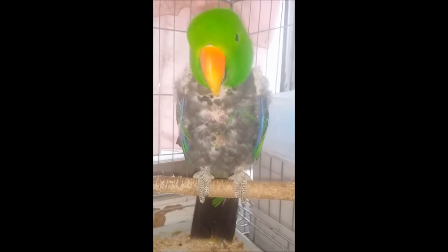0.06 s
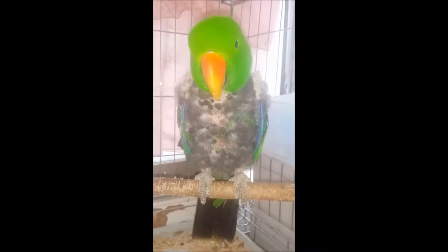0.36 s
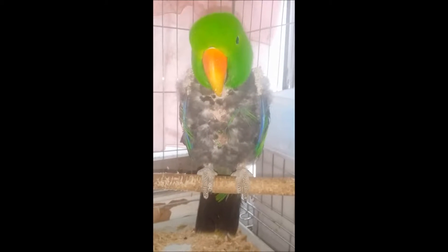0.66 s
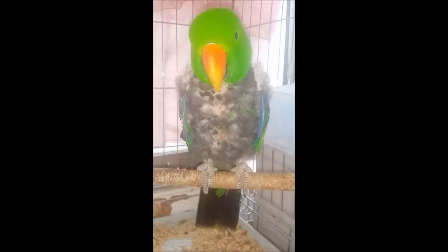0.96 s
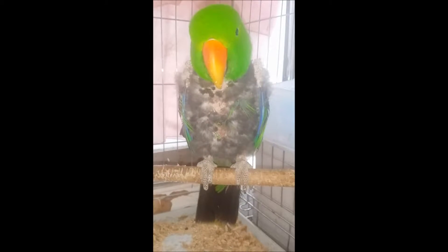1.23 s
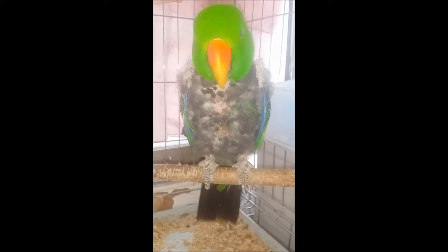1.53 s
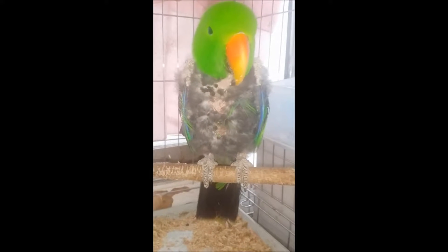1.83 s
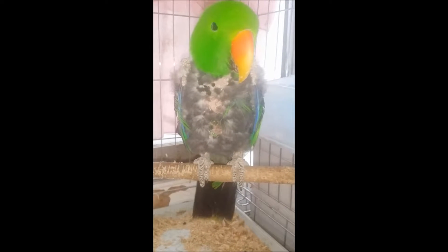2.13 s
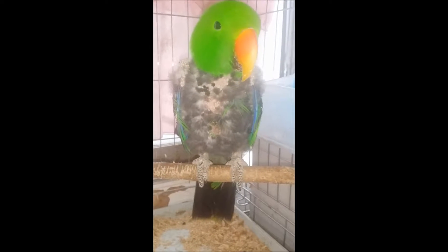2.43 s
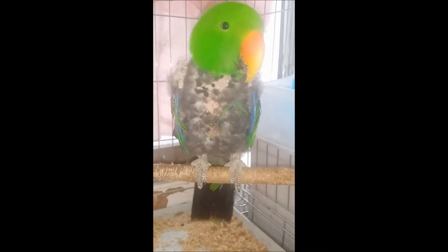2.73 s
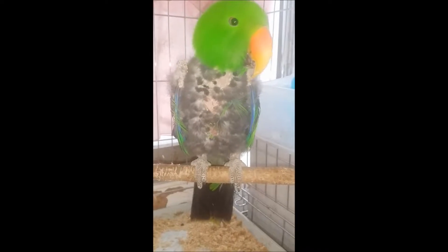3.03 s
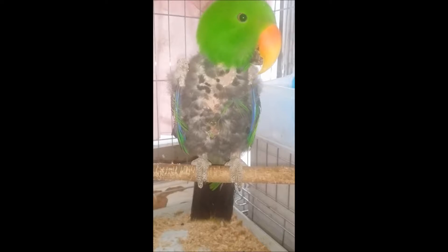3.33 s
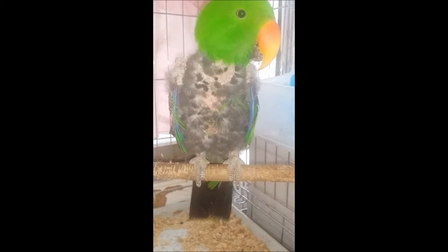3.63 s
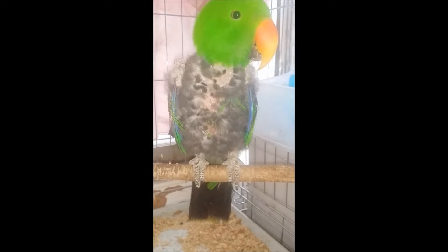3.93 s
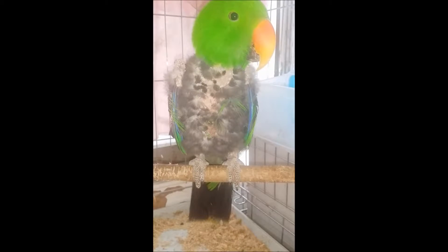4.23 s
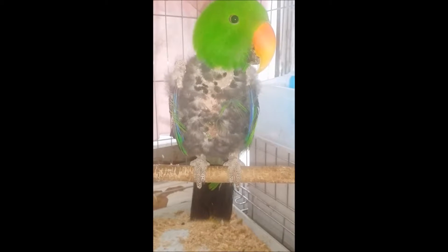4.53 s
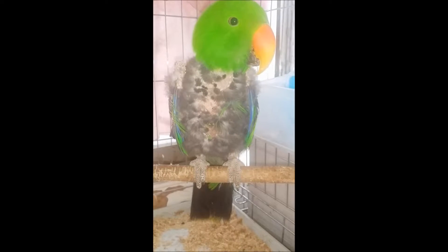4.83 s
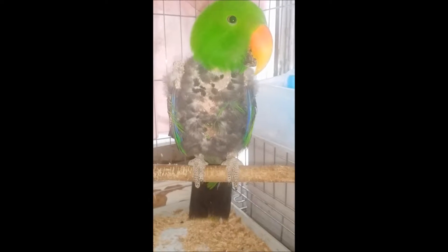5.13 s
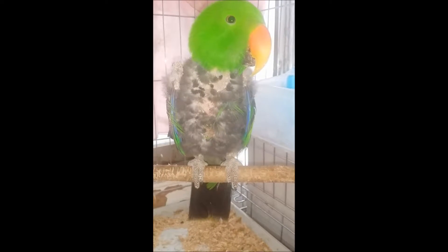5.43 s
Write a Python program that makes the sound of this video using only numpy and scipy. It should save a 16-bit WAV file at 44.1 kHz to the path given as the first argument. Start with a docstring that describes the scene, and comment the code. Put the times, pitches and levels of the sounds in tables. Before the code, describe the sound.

A parrot gives a tiny shrill squeak, then shuffles on its wooden perch with soft thuds, gritty claw scratches and short, hissy rasps. Sharp beak or claw clicks follow in the middle, with a light rustle of feathers and dull bumps of the cage. After a lull, a few more clicks lead to a rough, squeaky call. It is all close by in a small, quiet room.

```python
"""Parrot on its perch

A parrot shifts about on a wooden perch in a wire cage, close by in a small room.
Beak and claws click and scratch, knocking the wood and ringing the bars; feet thud on the
perch, the cage sways and feathers rustle. Soft, hissy rasps come in between. Shrill squeaks
open and close the scene, two-voiced because each side of the syrinx whistles on its own."""
import sys
import numpy as np
from scipy import signal
from scipy.fft import rfft, irfft, next_fast_len
from scipy.io import wavfile

SR = 44100
rng = np.random.default_rng(int(sys.argv[2]) if len(sys.argv) > 2 else 0)


def transcribe(signal):
    """Save signal, clipped to [-1, 1], as a 16-bit WAV file at the path in sys.argv[1]."""
    frames = np.atleast_2d(signal).T
    limited = np.clip(frames, -1, 1)
    pcm = np.round(limited * 32767).astype(np.int16)
    wavfile.write(sys.argv[1], SR, pcm)


N = 246078
TIME = np.arange(N) / SR


def undb(db):
    """Decibels to gain."""
    return 10 ** (np.asarray(db) / 20)


def unit(x):
    """Scale to rms 1."""
    return x / np.sqrt(np.mean(x ** 2) + 1e-20)


def add(out, start_s, x):
    """Mix a sound in at its start time."""
    i = max(0, int(start_s * SR))
    out[i:i + len(x)] += x[:max(0, N - i)]


def band(x, low_hz, high_hz, order=2):
    """Band-pass between two edges."""
    high_hz = min(high_hz, .47 * SR)
    low_hz = min(low_hz, .95 * high_hz)
    return signal.sosfilt(signal.butter(order, [low_hz, high_hz], "band", fs=SR, output="sos"), x)


def colour(x, eq):
    """Shape a sound with an EQ curve of (freq_hz, gain_db) points."""
    hz, db = np.transpose(eq)
    n = next_fast_len(len(x), True)
    bins_hz = np.fft.rfftfreq(n, 1 / SR)
    gain = undb(np.interp(np.log(bins_hz + 1), np.log(hz), db))
    return irfft(rfft(x, n) * gain, n)[:len(x)]


def wobble(n, rate_hz):
    """Smooth random motion of rms 1."""
    knots = np.arange(n) * rate_hz / SR
    return unit(np.interp(knots, np.arange(16384), rng.standard_normal(16384)))


def grit(n, spread_db):
    """Friction: dense tiny slips of very unequal size."""
    return unit(rng.standard_normal(n) * undb(spread_db * wobble(n, 1500)))


def ring(x, modes):
    """Drive a set of decaying modes."""
    t = TIME[:SR // 6]
    response = sum(undb(db) * np.sin(2 * np.pi * hz * t) * np.exp(-np.log(1000) * t / t60_s)
                   for hz, db, t60_s in modes)
    return signal.fftconvolve(x, response / np.linalg.norm(response))[:len(x)]


def swell(rise_s, hold_s, fall_s):
    """Pressure that builds up, holds and dies away by 20 dB every fall_s."""
    t = TIME[:SR // 3]
    return np.minimum(t / rise_s, 1) * 10 ** (-np.maximum(t - rise_s - hold_s, 0) / fall_s)


def match(x, envelope):
    """Give a sound the rms of an envelope."""
    return unit(x) * np.sqrt(np.mean(envelope ** 2))


def squeaks(trim_db=-.88, jitter=.068, flutter_db=5, air_db=-8.5, rough_per_db=.022):
    """Each side of the syrinx whistles on its own, breaking into a screech as it weakens."""
    # overlapping whistles: octave_db, least_roughness, contour of (time_s, pitch_hz, level_db)
    whistles = [ (-9.5, .13, [(0, 3956, -15), (.024, 4336, -25), (.033, 3525, -16), (.041, 3590, -32.5),
                (.056, 3630, -50)]), (19.5, .18, [(.01, 3370, -33), (.015, 3273, -20.5),
                (.029, 3140, -26.5)]), (-13.5, 0.052, [(5.298, 4540, -31.5), (5.31, 4380, -28),
                (5.317, 4450, -16.5), (5.324, 4980, -13)]), (-13.5, 0.53, [(5.322, 5000, -17.5),
                (5.342, 5100, -28.5), (5.368, 4446, -22), (5.384, 4600, -28), (5.397, 4765, -17),
                (5.414, 4700, -29)]), (27, 0.023, [(5.335, 3420, -31), (5.346, 3344, -11),
                (5.354, 3380, -21), (5.372, 3220, -37)]), (13, 0.52, [(5.372, 3210, -25), (5.39, 3456, -19),
                (5.403, 3540, -30)]), (7.5, 1, [(5.409, 2603, -26), (5.42, 2414, -27.5), (5.44, 2090, -34),
                (5.45, 2200, -34)]), (6, .3, [(5.448, 2290, -39.5), (5.463, 3086, -21), (5.483, 3740, -16),
                (5.495, 3310, -20), (5.513, 3176, -26)]), (-16, 0.24, [(5.511, 3550, -24),
                (5.53, 3370, -20), (5.552, 3370, -47)]), ]
    out = np.zeros(N)
    for octave_db, least_rough, contour in whistles:
        times, pitches, levels = np.transpose(contour)
        t = np.arange(times[0], times[-1], 1 / SR)
        hz, db = np.interp(t, times, pitches), np.interp(t, times, levels)
        rough = np.clip(least_rough + rough_per_db * (db.max() - db), 0, 1)
        pitch = hz * (1 + jitter * rough * wobble(len(t), rate_hz=1400))
        phase = 2 * np.pi * np.cumsum(pitch) / SR
        partials = undb([0, octave_db, octave_db / 2 - 12.5, octave_db / 2 - 15])
        tone = sum(gain * np.sin(k * phase) * (k * hz < SR / 2) for k, gain in enumerate(partials, 1))
        tone *= np.sqrt(2 / np.sum(partials ** 2))
        flutter = unit(undb(flutter_db * rough * wobble(len(t), rate_hz=900)))
        air = undb(air_db) * rough * unit(band(grit(len(t), spread_db=4), 3800, 14970))
        fade = np.clip(np.minimum(t - times[0], times[-1] - t) / .0017, 0, 1)
        voice = (tone * flutter + air) * undb(db + trim_db) * fade
        add(out, times[0], band(voice, .82 * hz.min(), 13800, order=8))  # low cut under the lowest note
    return out


def shuffle(trim_db=2, patchy_db=3):
    """Toes and feathers rub unevenly between the steps."""
    # swell and ebb of the rubbing: time_s, level_db
    restlessness = [(0.0, -64), (0.71, -70.5), (0.84, -59.5), (1.48, -69.5), (1.99, -58), (2.39, -65.5),
                    (2.61, -65.5), (2.78, -62), (2.97, -59.5), (3.51, -65), (3.7, -74.5), (4.27, -87),
                    (4.66, -78.5), (4.91, -80), (5.35, -61), (5.58, -67)]
    # its bass-heavy tone: freq_hz, gain_db
    rub_eq = [(40, 0.5), (130, -3), (230, 0), (450, -2), (800, -8), (1500, -15), (3000, -19.5), (8000, -20),
              (15000, -26.5)]
    db = np.interp(TIME, *np.transpose(restlessness)) + trim_db + patchy_db * wobble(N, rate_hz=45)
    return unit(colour(grit(N, spread_db=2.5), rub_eq)) * undb(db)


def feathers(trim_db=-6.5, patchy_db=2):
    """Feathers slide over one another in a soft, airy rustle."""
    # swell and ebb of the rustle: time_s, level_db
    rustle = [(0.2, -70), (0.65, -77), (0.76, -65), (1.38, -79), (1.89, -57), (2.39, -73), (3.41, -64),
              (4.01, -86), (4.9, -84), (5.25, -69)]
    db = np.interp(TIME, *np.transpose(rustle)) + trim_db + patchy_db * wobble(N, rate_hz=14)
    return unit(band(grit(N, spread_db=2), 4500, 13000)) * undb(db)


def room_tone(gain_db=-76.5):
    """A faint, steady bed of noise, partly shared by both ears."""
    # low rumble under a thin hiss: freq_hz, gain_db
    bed_eq = [(30, 0), (230, -9.5), (1400, -32.5), (3200, -23), (12600, -27.5), (15000, -23)]
    left, right, shared = (unit(colour(rng.standard_normal(N), bed_eq)) for _ in range(3))
    return undb(gain_db) * (.99 * np.array([left, right]) + .59 * shared)


def rasps(trim_db=-1, jitter=.06, air_db=1, sag=.151):
    """A weak, unsteady, sagging tone half drowned in the hiss of the throat."""
    # hoarse little calls: start_s, length_s, level_db, pitch_hz, roughness
    calls = [(0.087, .055, -39, 1688, 0.9), (0.597, 0.068, -39, 1837, 0.59), (.708, 0.056, -44, 1694, 0.82),
             (1.724, .05, -40, 1935, 0.65), (1.765, .05, -45, 1850, .2), (1.885, 0.041, -41, 1601, 1.01),
             (2.018, 0.041, -43, 1505, 0.71), (2.093, 0.034, -46.5, 1510, 1), (2.556, .055, -45, 1604, 0.9),
             (3.4, 0.09, -56.5, 1469, 0.25), (3.474, 0.04, -43.5, 1516, 0.62),
             (3.578, 0.047, -43.5, 1638, 1.05), (4.455, .045, -54, 1475, 1),
             (4.894, 0.024, -56.5, 1735, 0.65)]
    # colour of the throat: freq_hz, gain_db
    throat_eq = [(600, -18), (1200, -8.5), (1700, -4), (2500, 1), (3400, -0.5), (4400, -3.5), (5500, 1),
                 (8000, -2.5), (14000, -8.5)]
    out = np.zeros(N)
    for start_s, length_s, db, hz, rough in calls:
        n = int(length_s * SR)
        bend = sag * np.linspace(.5, -.5, n) + jitter * wobble(n, rate_hz=1200)
        phase = 2 * np.pi * np.cumsum(hz * (1 + rough * bend)) / SR
        buzz = unit(sum(np.sin(k * phase) for k in range(1, 9)))
        air = undb(air_db) * rough * grit(n, spread_db=2.2)
        voice = band(colour(buzz + air, throat_eq), 1000, 9600, order=4)
        add(out, start_s, unit(voice) * signal.windows.tukey(n, .4) * undb(db + trim_db))
    return out


def treads(trim_db=-.5, ring_db=-3):
    """Soft feet push the perch, which answers with a low wooden thud."""
    # feet treading and rubbing: start_s, hold_s, level_db, centre_hz
    steps = [(0.205, 0.0058, -35.5, 246), (0.371, 0.052, -49, 272), (0.738, 0.014, -39.5, 418),
             (0.894, 0.027, -45, 393), (1.249, 0.068, -49, 393), (1.49, 0.017, -50, 418),
             (1.61, 0.0018, -46, 312), (1.776, 0.036, -48.5, 442), (1.866, 0.025, -39.5, 413),
             (2.206, 0.0022, -46.5, 267), (2.316, .008, -50, 290), (2.595, 0.0018, -52.5, 870),
             (2.753, .005, -48, 420), (2.81, 0.014, -40, 303), (2.854, 0.018, -37.5, 384),
             (2.98, .015, -47.5, 242), (3.038, .004, -41, 326), (3.102, .002, -47, 650),
             (3.202, 0.0017, -44.5, 390), (3.277, .002, -45.5, 430), (3.474, 0.012, -41.5, 420),
             (4.463, .008, -52, 820), (4.553, .005, -49, 298), (4.922, 0.0018, -53, 447)]
    # modes of the perch: pitch_hz, level_db, t60_s
    perch_modes = [(222.7, -1, .08), (352.5, 1, .09), (420, -2, .09), (500, 0, .09), (895, -5, .06)]
    out = np.zeros(N)
    for start_s, hold_s, db, hz in steps:
        push = swell(rise_s=.0092, hold_s=hold_s, fall_s=.055)
        rub = band(grit(len(push), spread_db=3) * push, hz / 1.473, hz * 1.47)
        thud = unit(rub) + undb(ring_db) * unit(ring(rub, perch_modes))
        add(out, start_s, undb(db + trim_db) * match(thud, push))
    return out


def cage_sways():
    """The whole cage sways for a few slow cycles: a dull bump in the bass."""
    # sways of the cage: start_s, level_db
    sways = [(0.216, -51), (2.201, -46), (2.833, -37), (3.21, -45), (3.989, -63.5), (4.711, -62)]
    out = np.zeros(N)
    push = swell(rise_s=.011, hold_s=0, fall_s=.078)
    for start_s, db in sways:
        rumble = band(rng.standard_normal(len(push)) * push, 39, 84)
        add(out, start_s, undb(db) * match(rumble, push))
    return out


def scratches(wood_db=-11):
    """Gritty scrapes sound through the wood; those that catch the bars set the wires ringing."""
    # claws and feathers scraping: start_s, hold_s, level_db, low_hz, high_hz, wire_mix_db
    scrapes = [(0.371, 0.0071, -53.5, 600, 2100, -28), (0.747, 0.01, -38, 800, 9400, -12),
               (0.894, 0.0025, -42, 1190, 9200, -16), (0.943, 0.0044, -51.5, 3000, 8600, -15),
               (1.042, 0.0018, -57.5, 3500, 14000, -15), (1.118, 0.0067, -62, 700, 2190, -21.5),
               (1.275, 0.034, -58, 600, 3930, -23), (1.459, 0.0023, -43, 3030, 14000, -14.5),
               (1.612, 0.0025, -30.5, 3200, 14900, -3.5), (1.79, 0.019, -37.5, 3520, 12500, -17.5),
               (1.852, 0.009, -35, 3040, 13000, -18), (2.614, 0.0054, -47.5, 7000, 10800, -18.5),
               (2.813, 0.087, -44, 895, 9500, -31), (3.209, 0.018, -52, 1490, 9700, -23),
               (4.2, 0.0027, -53.5, 7800, 10000, -26), (4.547, 0.013, -38.5, 2320, 9900, -33),
               (5.156, 0.16, -54.5, 1000, 12500, -17)]
    # modes of the cage wires: pitch_hz, level_db, t60_s
    wire_modes = [(3120, -5, .07), (3290, -6, .06), (5600, -4, .12), (8050, -3, .15), (9250, -4, .2),
                  (12100, -8, .15)]
    out = np.zeros(N)
    for start_s, hold_s, db, low_hz, high_hz, wire_mix_db in scrapes:
        push = swell(rise_s=.0047, hold_s=hold_s, fall_s=.033)
        slips = grit(len(push), spread_db=5.5) * push
        scrape = match(band(slips, low_hz, high_hz), push)
        weight = min(1, 3000 / low_hz) ** 2  # light, high scrapes hardly move the wood
        wood = undb(wood_db) * weight * match(band(slips, 680, 2440), push)
        wires = undb(wire_mix_db) * match(ring(scrape, wire_modes), push)
        add(out, start_s, undb(db) * (scrape + wood + wires))
    return out


def clicks(crack_s=.0016, wood_db=-7.5):
    """Beak or claw strikes: one snap, a brief crumbling crack and the knock of the wood."""
    # hard contacts: start_s, strength_db, centre_hz
    hits = [(1.223, -33.5, 2920), (2.076, -8, 4440), (2.213, 0.5, 3300), (2.321, -21, 770),
            (2.527, -30.5, 6300), (2.759, -19.5, 755), (2.9396, 1, 7000), (2.943, -10, 2130),
            (3.109, -15.5, 1550), (3.335, -21.5, 1460), (3.3799, -16.5, 2450), (3.681, -22.5, 1220),
            (3.878, -35.5, 2503), (4.673, -33, 3017), (4.9312, -12.5, 5200), (4.94, -11, 5360),
            (5.0363, -23.5, 5200)]
    # modes of the knocked wood: pitch_hz, level_db, t60_s
    wood_modes = [(490, 3.5, .04), (945, -6, .022), (1270, 1, 0.0085), (1947, -.5, 0.0083)]
    out, t = np.zeros(N), TIME[:SR // 16]
    for start_s, db, hz in hits:
        octaves = max(4.2 + .08 * db, 1)  # the harder the click, the wider its band
        spread = 2 ** (octaves / 2)
        crack = rng.standard_normal(len(t)) * np.exp(-t / crack_s)
        impulse = t == 0
        snap = band(impulse + crack / np.linalg.norm(crack), hz / spread, hz * spread, order=1)
        click = snap + undb(wood_db) * ring(snap, wood_modes)
        add(out, start_s, undb(db) * click / np.linalg.norm(click))
    return band(out, 200, 12500)


def room(x, wet_db, pan_db, t60_s, tail_db=-22.5, tail_t60_s=.36):
    """Direct sound, dense reflections off the near walls and a faint tail, unlike in each ear."""
    t = TIME[:SR // 4]
    decay = np.exp(-np.log(1000) * t / t60_s) + undb(tail_db) * np.exp(-np.log(1000) * t / tail_t60_s)
    walls = rng.standard_normal((2, len(t))) * decay * (t > .0012)  # 1.2 ms pre-delay
    response = undb(wet_db) * walls / np.linalg.norm(walls, axis=1, keepdims=True)
    response[:, 0] = 1  # direct sound
    response *= undb([[pan_db / 2], [-pan_db / 2]]) / np.sqrt(1 + undb(wet_db) ** 2)
    return signal.oaconvolve(x[None], response, axes=1)[:, :N]


def scene():
    """Bird and cage sit a little to the right in the small room; the low sways stay dry."""
    return (room(squeaks(), wet_db=3.5, pan_db=-2.9, t60_s=.078)
            + room(rasps() + scratches() + feathers(), wet_db=6.5, pan_db=-3.5, t60_s=.11)
            + room(clicks(), wet_db=4, pan_db=-4, t60_s=.084)
            + room(treads() + shuffle(), wet_db=-5.5, pan_db=-2.5, t60_s=.13)
            + cage_sways() * undb([[-2], [1]])
            + room_tone())


def record(dry, top_hz=15700):
    """A steep low-pass takes off the highest treble."""
    return signal.sosfilt(signal.ellip(8, .2, 70, top_hz, fs=SR, output="sos"), dry)


dry = scene()
out = record(dry)
transcribe(out)
```